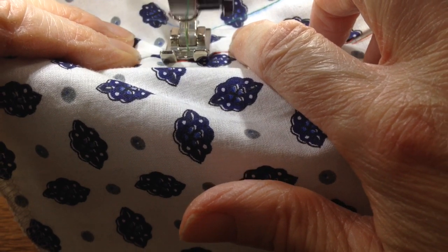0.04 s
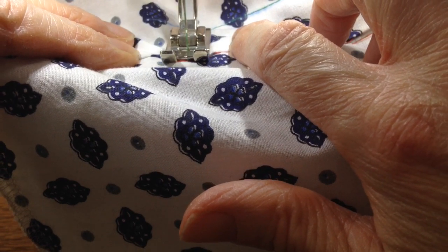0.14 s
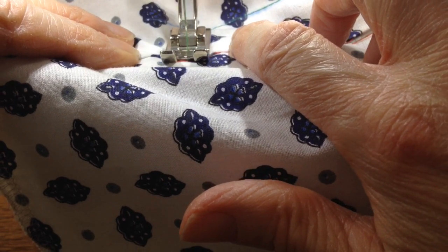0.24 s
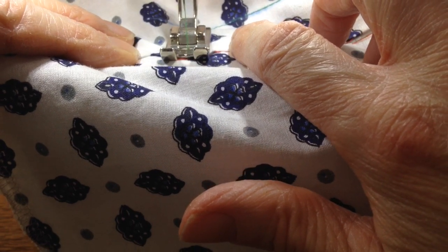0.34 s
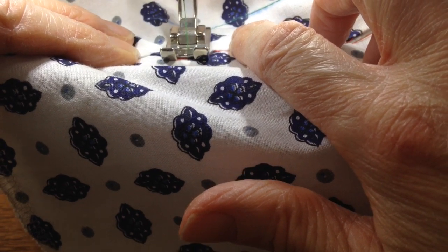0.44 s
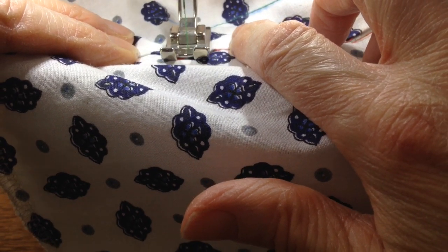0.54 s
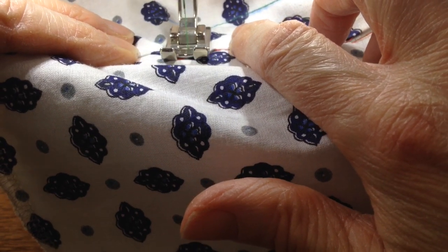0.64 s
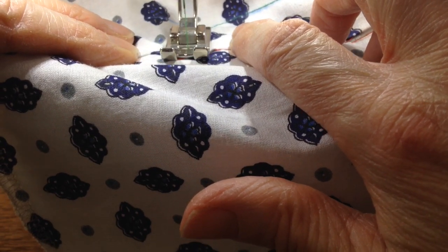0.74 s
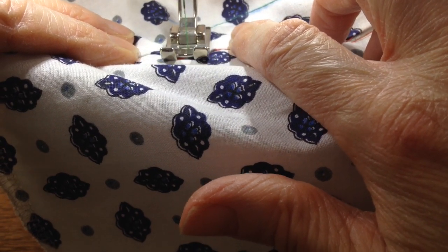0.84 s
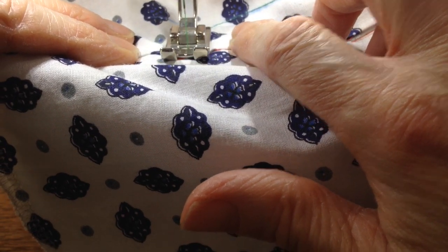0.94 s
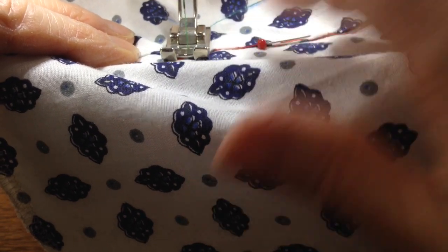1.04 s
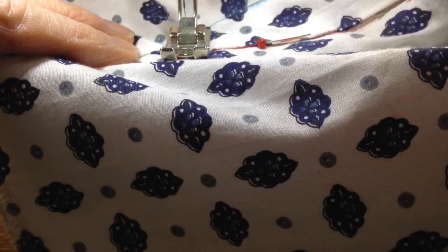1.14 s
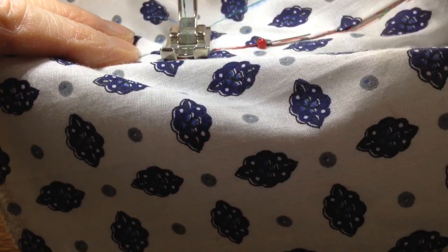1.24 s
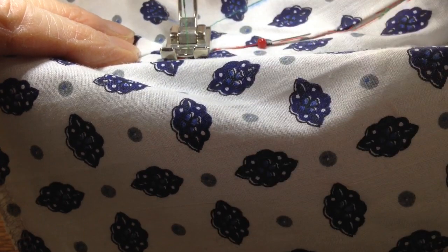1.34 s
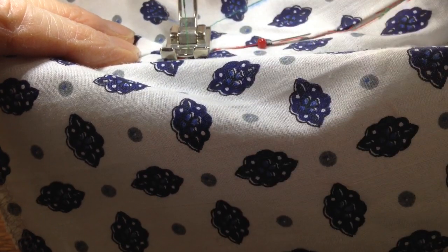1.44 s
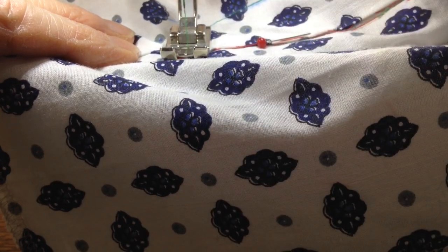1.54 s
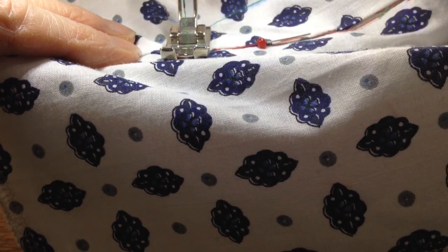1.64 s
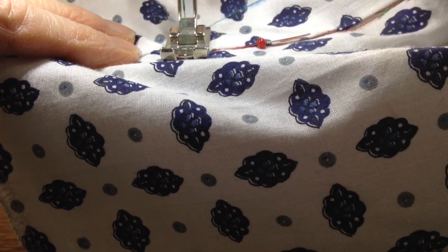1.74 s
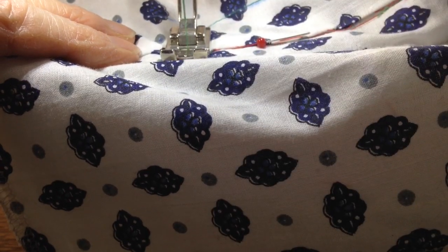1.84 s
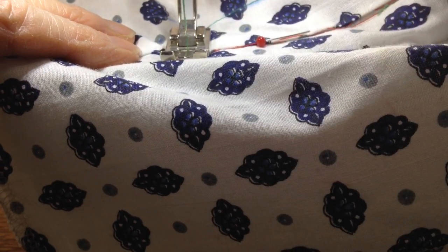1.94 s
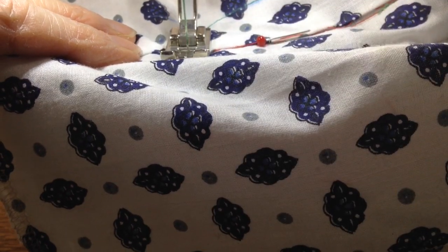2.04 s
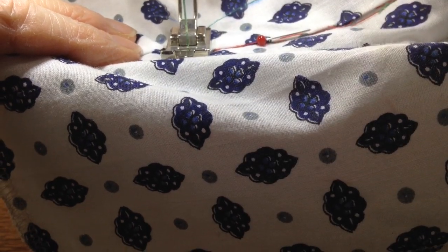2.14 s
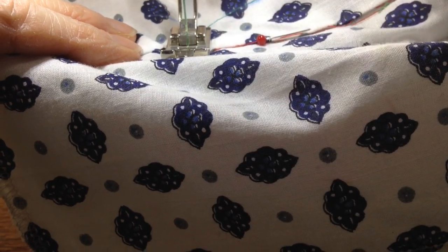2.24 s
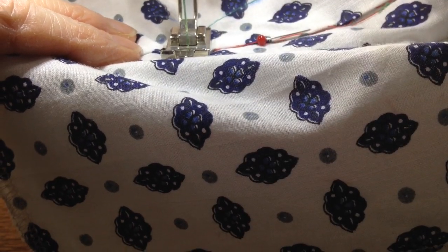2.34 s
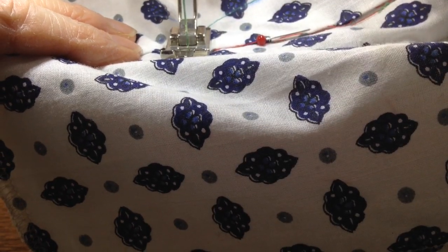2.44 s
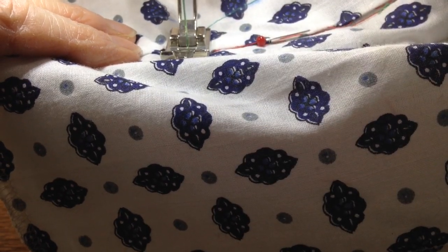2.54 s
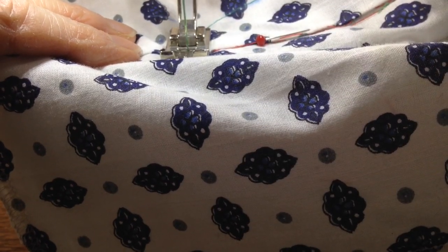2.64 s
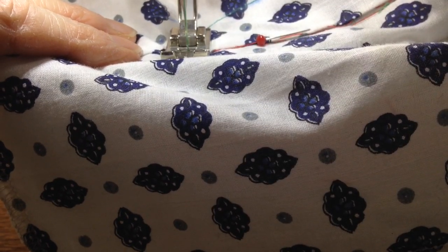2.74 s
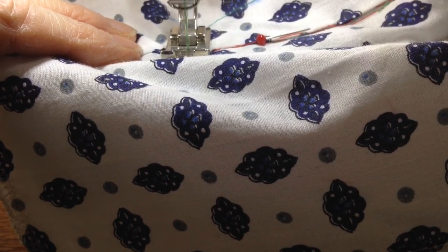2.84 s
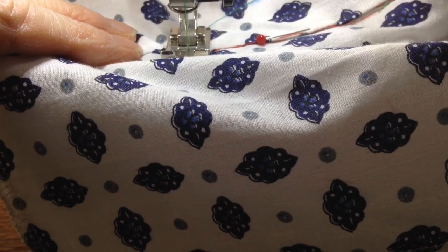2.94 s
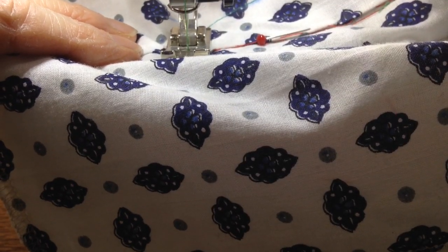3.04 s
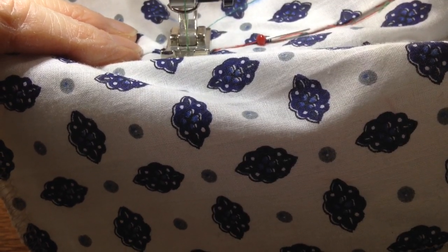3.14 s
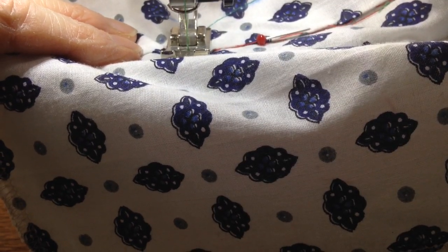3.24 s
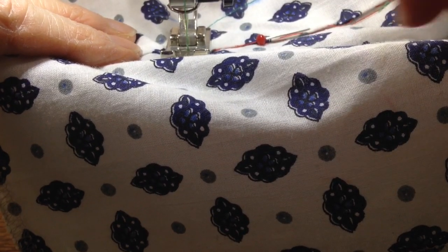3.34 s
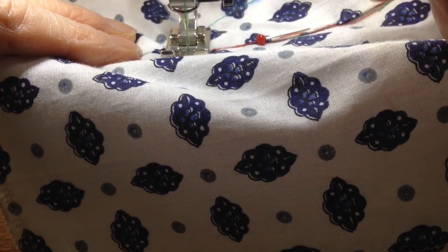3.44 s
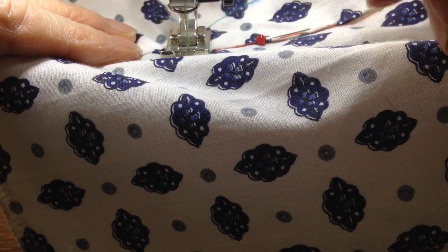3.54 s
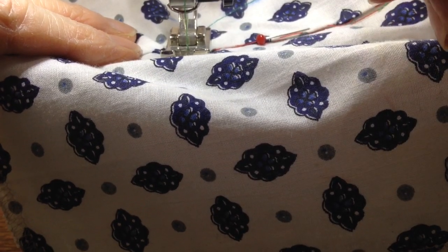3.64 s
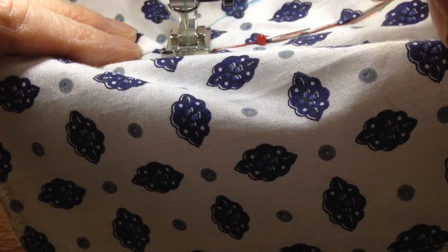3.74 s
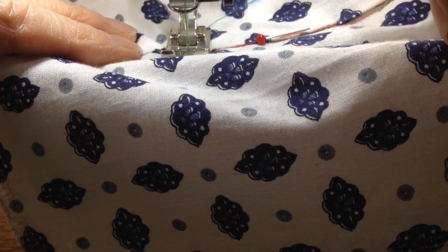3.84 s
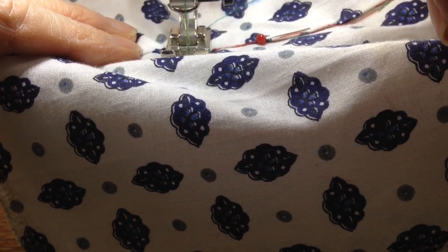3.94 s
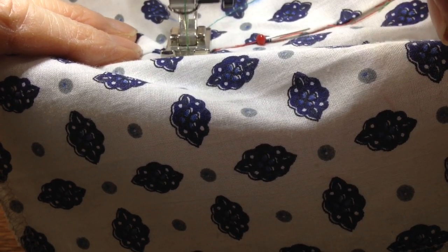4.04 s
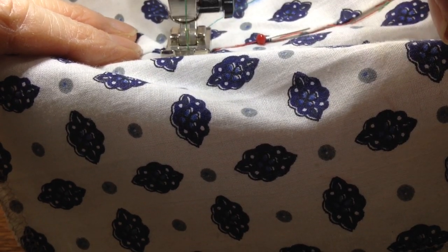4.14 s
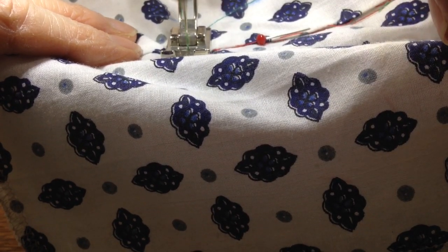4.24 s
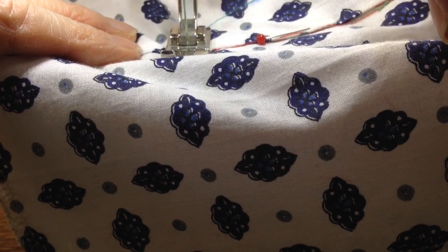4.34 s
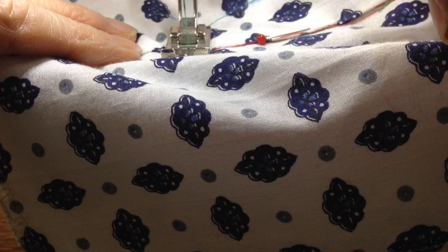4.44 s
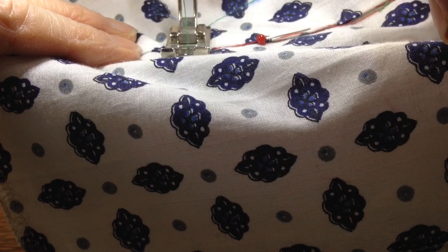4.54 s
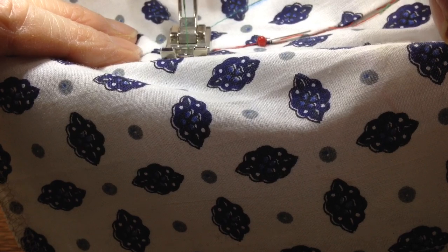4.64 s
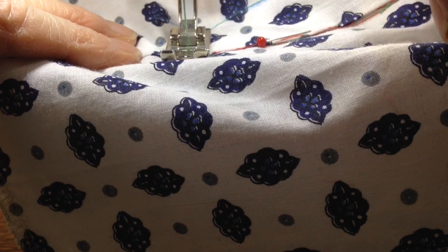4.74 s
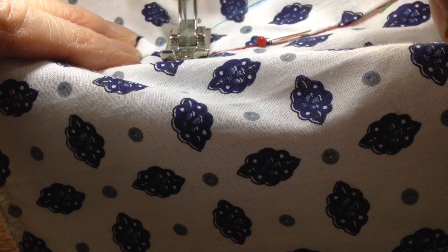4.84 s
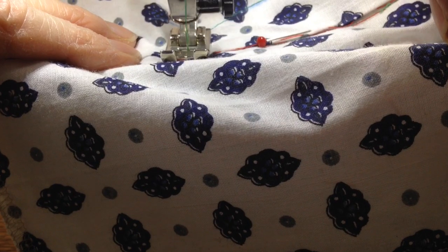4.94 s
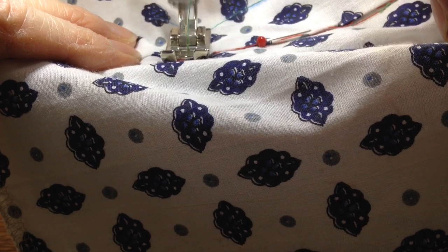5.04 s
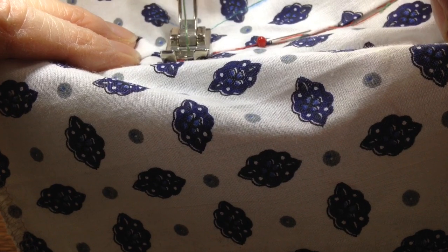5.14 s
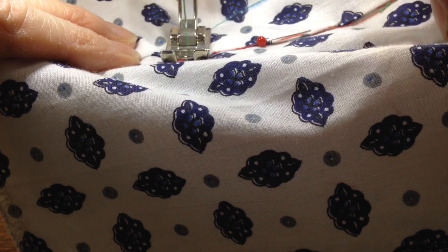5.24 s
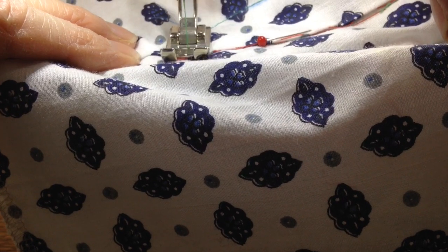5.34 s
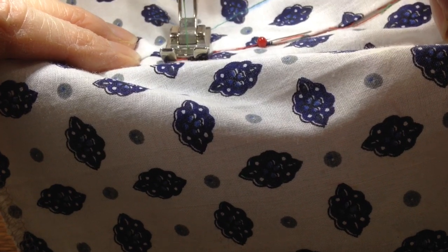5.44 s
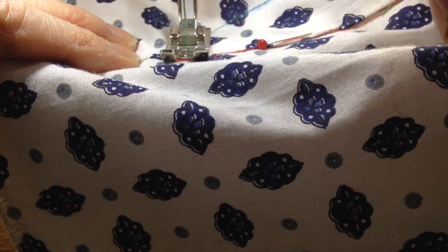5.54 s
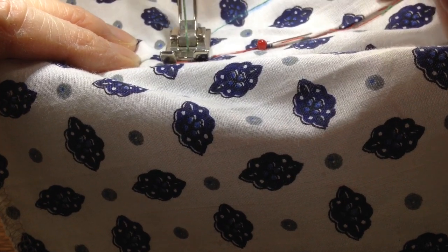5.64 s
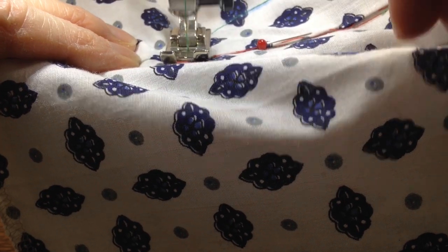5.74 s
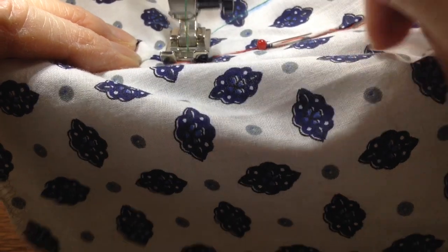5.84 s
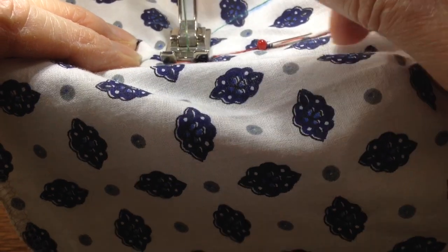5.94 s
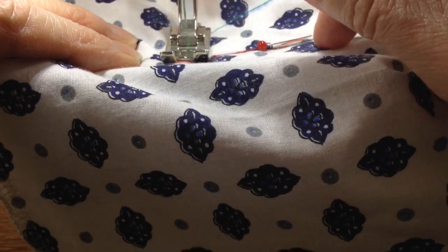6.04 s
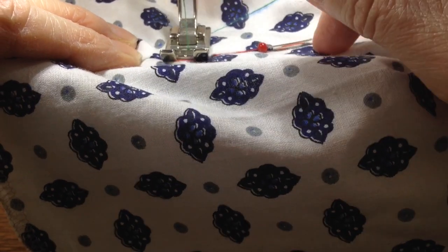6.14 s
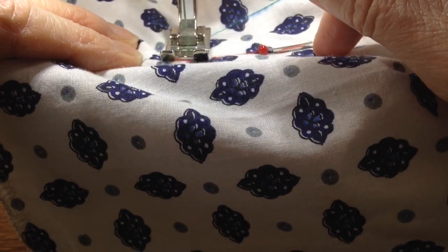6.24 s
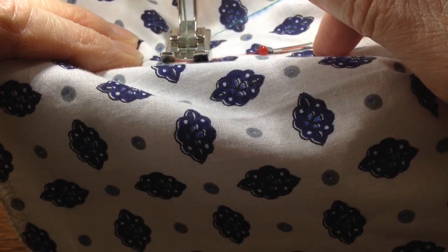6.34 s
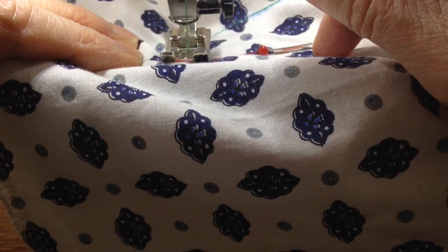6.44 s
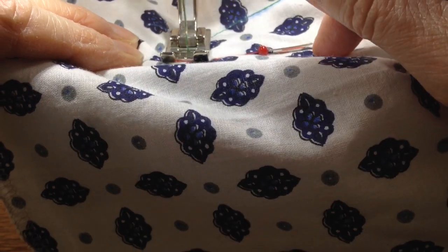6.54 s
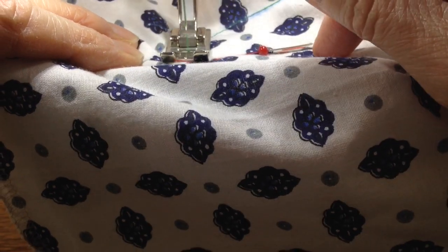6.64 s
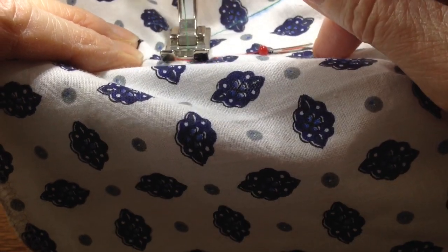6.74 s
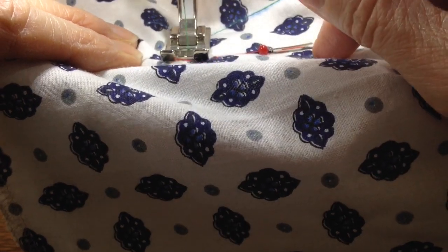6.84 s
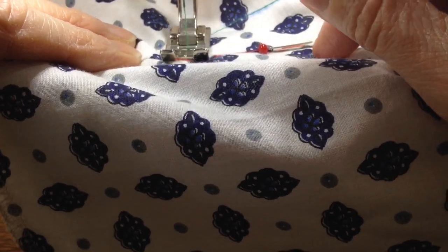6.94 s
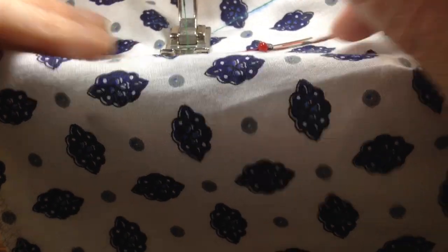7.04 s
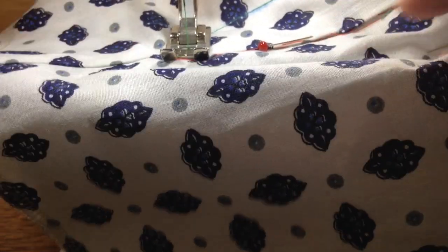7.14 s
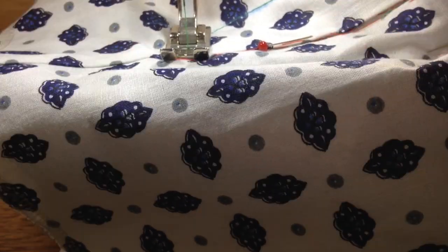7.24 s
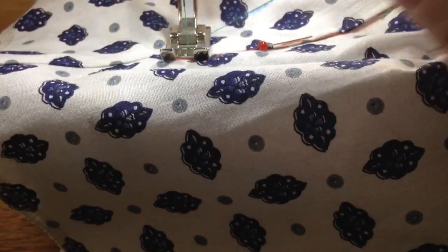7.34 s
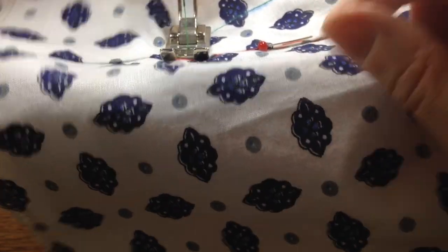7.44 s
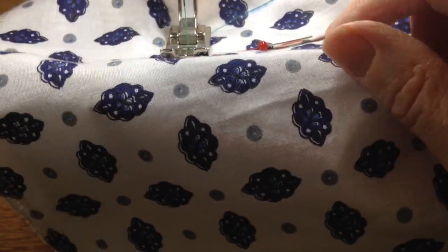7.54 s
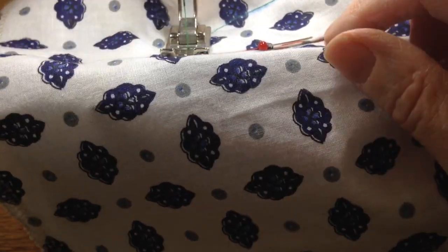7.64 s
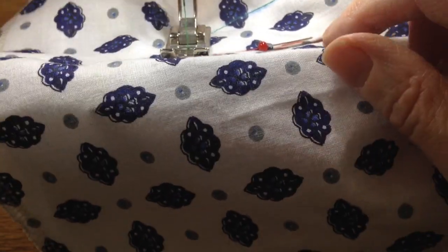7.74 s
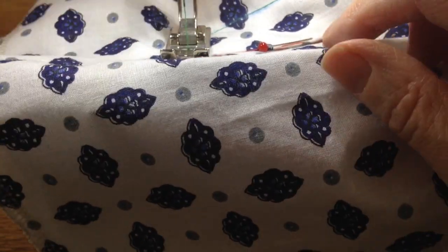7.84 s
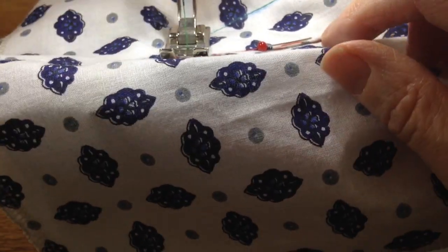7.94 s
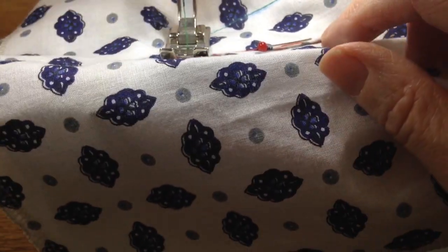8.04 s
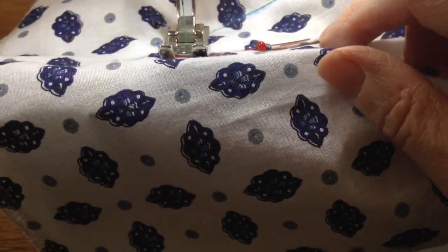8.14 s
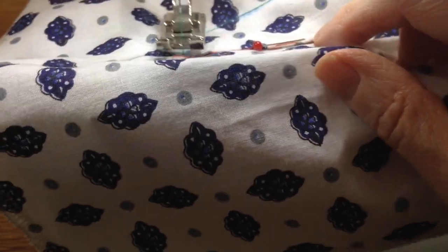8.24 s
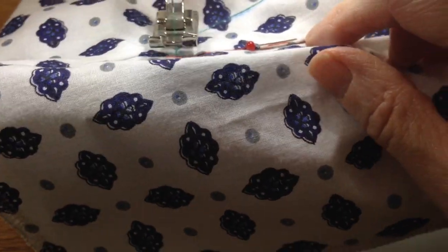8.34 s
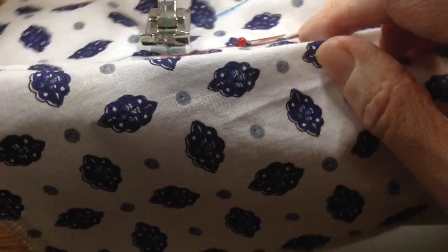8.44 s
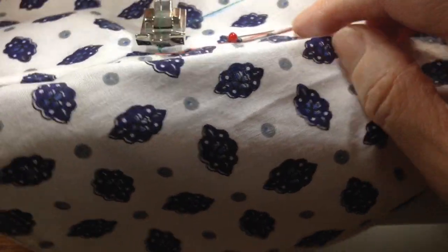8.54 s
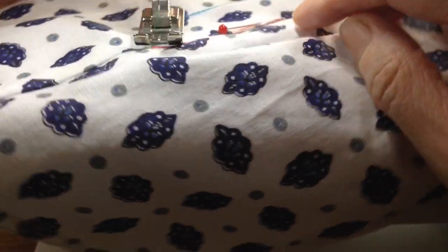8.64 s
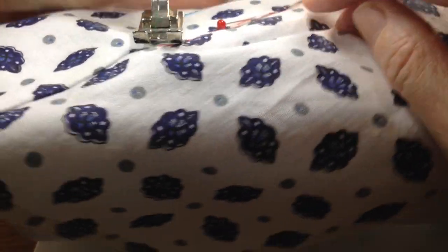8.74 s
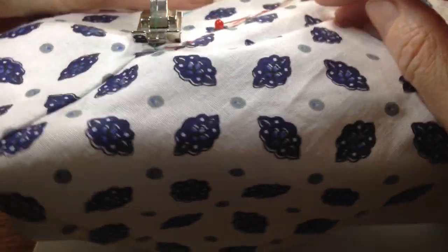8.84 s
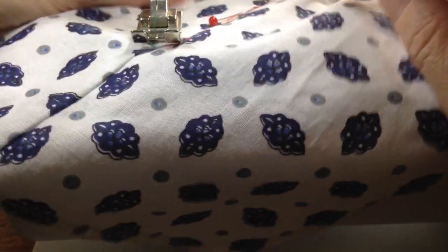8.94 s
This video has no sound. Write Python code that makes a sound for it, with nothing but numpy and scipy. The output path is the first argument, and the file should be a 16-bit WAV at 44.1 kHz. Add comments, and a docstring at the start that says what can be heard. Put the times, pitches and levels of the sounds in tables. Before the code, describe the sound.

Close up in a small room, a sewing machine ticks and whirrs in slow stop-start stitches, with quiet cloth handling and sharp metallic clacks near the end.

```python
"""A household sewing machine stitches cotton slowly, in stop-start runs, close to the microphone in a small room.
Its steel links tick as decaying modes plus bursts of contact noise; the motor hums in unsteady tones and
the drive whirrs as grainy noise through the housing. Thread hisses in shaped noise with a wandering note.
Hands shift the fabric in swells of rumble and rustle, and levers clunk as struck modes of the casing.
A short decaying noise answers for the walls, over a steady faint hiss."""
import sys
import numpy as np
from scipy import signal
from scipy.fft import rfft, irfft, next_fast_len
from scipy.io import wavfile
from scipy.ndimage import map_coordinates

SR = 44100
rng = np.random.default_rng(int(sys.argv[2]) if len(sys.argv) > 2 else 0)


def wav_out(sig):
    """Save sig, one row per channel (or a flat mono array), as 16-bit PCM at SR to the path in sys.argv[1]."""
    wavfile.write(sys.argv[1], SR, np.round(np.clip(np.atleast_2d(sig).T, -1, 1) * 32767).astype(np.int16))


N = 397329


def amp(db):
    """Decibels to gain."""
    return 10 ** (np.asarray(db) / 20)


def unit(x):
    """Scale to rms 1."""
    return x / np.sqrt(np.mean(x ** 2) + 1e-20)


def along(points, hz):
    """Points of (f/Hz, value) read on a log frequency axis."""
    f, v = np.transpose(points)
    return np.interp(np.log(hz + 1), np.log(f + 1), v)


def wobble(rate, size=N):
    """A smooth random curve with rate knots a second."""
    knots = rng.standard_normal(int(size * rate / SR) + 4)
    return map_coordinates(knots, [np.arange(size) * rate / SR])


def filtered(x, response):
    """Filter x by a response given as a function of frequency."""
    m = next_fast_len(len(x) + 8192)
    hz = np.fft.rfftfreq(m, 1 / SR)
    return irfft(rfft(x, m) * response(hz), m)[:len(x)]


def coloured(x, spectrum):
    """Give x the colour of a spectrum, at rms 1."""
    return unit(filtered(x, lambda hz: amp(along(spectrum, hz))))


def grainy(rate, share):
    """White noise with a share of its power in tiny random impacts, rate a second."""
    share = np.clip(share, 0, 1)
    grains = (rng.random(N) < rate / SR) * rng.uniform(-1.1, 1, N)
    return np.sqrt(share) * unit(grains) + np.sqrt(1 - share) * rng.standard_normal(N)


def add(track, s, sound):
    """Mix a sound into a track from s seconds on."""
    start = max(round(s * SR), 0)
    track[start:start + len(sound)] += sound[:max(len(track) - start, 0)]


# steel linkage modes: f/Hz, level/dB, t60/s
STEEL = [(481, 2.5, 0.094), (695.5, -4, 0.0823), (866.5, 1, .08), (1143, -2.5, 0.047), (1328, -2.5, 0.091),
         (1886, -0.5, 0.036), (2076, -2.5, 0.057), (2250, -2.5, 0.083), (2387, -2.5, 0.055),
         (2700, -6, 0.029), (2955.6, -4, 0.044), (3255, -4.5, 0.021), (4100, -7, 0.039), (6200, -12, 0.024),
         (6900, -13, 0.022), (8700, -14.5, 0.016), (13800, -20.5, 0.04)]
# where ticks split into body, ring and treble: f/Hz
TICK_SPLIT_HZ = [1600, 4000]


def linkage():
    """Steel parts slide, take up their play and ring briefly, damped by oil."""
    out = np.zeros(N)
    slide_s, oiled_t60 = 0.012, 0.075
    for s, body_db, ring_db, treble_db, note_hz in contacts():
        hit = strike(STEEL, oiled_t60, crack_db=3.0, crack_t60=0.013, rattle_db=-5.0, rattle_t60=0.1,
                     build_cycles=8.6, bounce_db=-8.5, bounce_gap=0.0031)
        # a hard snap seats at once and stops its own ring
        hardness = np.clip((treble_db + 43) / 8, 0, 1)
        hit = hit * amp(-60 * hardness * np.arange(len(hit)) / SR / 0.0556)
        hit = with_note(hit, note_hz)
        add(out, s, voiced(hit, TICK_SPLIT_HZ, [body_db, ring_db, treble_db], size=441))
        add(out, s - slide_s, scrape(ring_db - 14.5, slide_s))
    return out * amp(-3.0)


# Levels of the contact tables below set the balance ahead of the linkage's common trim.
# marks of each stitch: needle bar turns t/s, needle pierces t/s, hook catches t/s, take-up lever snaps t/s
STITCHES = [(0.110, 0.277, 0.387, 0.581), (4.267, 4.452, 4.5275, 4.7245), (5.079, 5.235, 5.349, 5.533),
            (5.888, 5.963, 6.124, 6.258), (6.533, 6.637, 6.7535, 6.9455)]
# force of each stitch: turn level/dB, pierce level/dB, catch level/dB, snap level/dB,
# looseness before the catch level/dB, thread level/dB
STITCH_FORCE = [(2, -2.5, 2.5, 2.5, -31, 3.5), (-0.5, 7.5, 5, 3.5, -3, -1.5), (-2, 2, -3.5, -4.5, 3.5, 1),
                (0, -4, -1, 2.5, 1, 3.5), (-1.5, 0, 2, 1.5, -3.5, -4)]
# the blow at each mark, before its force: body level/dB, ring level/dB, treble level/dB, note f/Hz
STITCH_BLOWS = [(-77, -45.5, -59, 3033), (-40.5, -45.5, -54.5, 790), (-39, -45.5, -48.5, 880),
                (-52, -34.5, -49.5, 2850)]
# the take-up spring chatters after its snap: gap between rebounds, loss at each, note
REBOUND_S, REBOUND_LOSS_DB, REBOUND_HZ = 0.0055, 5.5, 6450
# its first rebound, before the snap's force: body level/dB, ring level/dB, treble level/dB
REBOUND_DB = [-45.5, -48, -47]
# loose links tick on the needle's way down, before looseness:
# place among the marks 0-3, body level/dB, ring level/dB, treble level/dB, note f/Hz
STITCH_PLAY = [(0.409, -52, -52, -57, 1210), (.5, -47, -51, -56, 770), (1.86, -58.5, -48.5, -61, 3100)]
# the loop slips off the hook, at one level in every stitch:
# place among the marks 0-3, body level/dB, ring level/dB, treble level/dB, note f/Hz
LOOP_SLIPS = [(2.605, -43.5, -43.5, -53, 2205), (2.709, -53.5, -45, -62.5, 2800)]
# the feed dog moves the cloth between stitches: rise t/s, drop t/s
FEEDS = [(4.872, 4.989), (5.6985, 5.807), (6.367, 6.475)]
# force of each feed: rise level/dB, drop level/dB, thread level/dB
FEED_FORCE = [(-1, -5.5, -27), (1, -1, 2.5), (-0.5, 3, -8.5)]
# contacts within any feed, before its force:
# place from rise 0 to drop 1, body level/dB, ring level/dB, treble level/dB, note f/Hz
FEED_CONTACTS = [(0, -44.5, -47.5, -46.5, 2710), (0.123, -44.5, -42, -52, 905),
                 (0.362, -37.5, -43, -45, 1300), (.57, -56.5, -54, -51, 2300), (1, -46.5, -51, -51.5, 800)]
# stray clicks of steel parts touched or snapping: t/s, body level/dB, ring level/dB, note f/Hz
CLICKS = [(0.3731, -43, -48, 840), (0.386, -37.5, -33, 6400), (3.5116, -49.5, -53.5, 1910),
          (3.547, -55, -59.5, 1890), (3.636, -55, -50, 1850), (3.7358, -32.5, -26.5, 2860),
          (3.781, -46.5, -46, 1930), (4.126, -41, -51, 1180), (4.171, -43, -52.5, 1180),
          (4.2894, -51, -49, 2876), (4.511, -58.5, -55, 2700), (4.885, -36.5, -44.5, 1250),
          (5.326, -45, -50.5, 3000), (5.575, -51, -52.5, 2290), (5.613, -59, -53.5, 5300),
          (5.6376, -38, -27.5, 1740), (5.739, -41, -39, 2280), (5.7492, -45, -41, 3200),
          (5.765, -41.5, -39, 1950), (6.116, -52, -45.5, 2900), (7.615, -45.5, -47.5, 1950),
          (7.792, -38.5, -46.5, 1820)]
# fingers tap and nudge the bed, dully: t/s, body level/dB, ring level/dB, note f/Hz
TAPS = [(1.554, -62, -78, 310), (1.881, -59, -57.5, 1510), (1.908, -54, -63, 945),
        (2.021, -60.5, -62, 2530), (2.122, -58, -58, 1500), (2.1516, -53.5, -60, 1870),
        (2.939, -55.5, -60, 1290), (3.037, -60, -72, 1700), (8.2871, -45, -58, 1620)]
CLICK_TREBLE_DB, TAP_TREBLE_DB = -0.5, -17  # relative to the ring


def contacts():
    """Yield every contact that rings the steel: time, body, ring and treble levels, and note."""
    for marks, (*force_db, loose_db, _) in zip(STITCHES, STITCH_FORCE):
        for s, db, (*bands_db, hz) in zip(marks, force_db, STITCH_BLOWS):
            yield s, *(db + np.array(bands_db)), hz
        for k in range(3):
            rebound_db = force_db[-1] - k * REBOUND_LOSS_DB + np.array(REBOUND_DB)
            yield marks[-1] + (k + 1) * REBOUND_S, *rebound_db, REBOUND_HZ
        for place, *bands_db, hz in STITCH_PLAY:
            yield moment(marks, place), *(loose_db + np.array(bands_db)), hz
        for place, *bands_db, hz in LOOP_SLIPS:
            yield moment(marks, place), *bands_db, hz
    for marks, (rise_db, drop_db, _) in zip(FEEDS, FEED_FORCE):
        for place, *bands_db, hz in FEED_CONTACTS:
            force_db = rise_db + place * (drop_db - rise_db)
            yield moment(marks, place), *(force_db + np.array(bands_db)), hz
    for s, body_db, ring_db, hz in CLICKS:
        yield s, body_db, ring_db, ring_db + CLICK_TREBLE_DB, hz
    for s, body_db, ring_db, hz in TAPS:
        yield s, body_db, ring_db, ring_db + TAP_TREBLE_DB, hz
    yield from rattles()


def moment(marks, place):
    """Time of a place in a cycle, moving evenly from mark to mark and on past the last."""
    mark = int(np.clip(place, 0, len(marks) - 2))
    return marks[mark] + (place - mark) * (marks[mark + 1] - marks[mark])


# loose parts rattle when nudged: t/s, length t/s, body level/dB, ring level/dB, treble level/dB
RATTLES = [(1.843, 0.022, -55, -66, -78), (2.719, 0.0322, -53.5, -73.5, -70),
           (2.851, 0.043, -52.5, -63, -62), (3.812, .035, -48.5, -51, -72)]
RATTLE_GAP_S, RATTLE_SCATTER_DB = 0.009, 2.5  # mean time between contacts; spread of their strength
RATTLE_NOTE_HZ, RATTLE_NOTE_OCTAVES = 1312, 0.48  # centre and spread of their notes


def rattles():
    """Loose parts touch in quick uneven contacts, each with its own force and note."""
    for start, length, *bands_db in RATTLES:
        count = max(round(length / RATTLE_GAP_S), 1)
        for k, (late, force, note) in enumerate(rng.standard_normal((count, 3))):
            s = start + (k + 0.5 + late / 4) * length / count
            note_hz = RATTLE_NOTE_HZ * 2 ** (RATTLE_NOTE_OCTAVES * note)
            yield s, *(RATTLE_SCATTER_DB * force + np.array(bands_db)), note_hz


# contact noise: f/Hz, level/dB per Hz
CRACK = [(30, -39.5), (90, -13.5), (250, 1.5), (900, 8), (2400, 3.5), (3500, -1.5), (5500, -6), (9000, -14),
         (15000, -26.5)]
MODE_DRIFT = 0.012  # the modes shift as the parts move: spread as a share of their frequency


def strike(modes, longest_t60, crack_db, crack_t60, rattle_db, rattle_t60, build_cycles, bounce_db, bounce_gap):
    """One blow: modes at new strengths, and a crack that rebounds a few times and ends in a rattle."""
    t = np.arange(SR // 4) / SR
    hz, db, t60 = np.transpose(modes)[:, :, None]
    strength, detune, phase = rng.standard_normal((3, len(modes), 1))
    swing = np.sin(2 * np.pi * (hz * (1 + MODE_DRIFT * detune) * t + phase))
    build = 1 - np.exp(-t * hz / build_cycles)  # low modes take longer to get going
    decay = amp(db + 2 * strength - 60 * t / np.minimum(t60, longest_t60))
    ring = np.sum(decay * build * swing, axis=0)
    crack = amp(crack_db - 60 * t / crack_t60) * (1 - np.exp(-t / 0.00056))
    contact = crack + amp(rattle_db - 60 * t / rattle_t60)
    bounce_times = np.cumsum(bounce_gap * rng.uniform(0.61, 1.6, size=3))
    for bounce, s in enumerate(bounce_times, start=1):
        add(contact, s, amp(bounce * bounce_db) * crack)
    judder = amp(4.5 * wobble(400, size=len(t)))  # the faces touch unevenly
    return ring + contact * judder * coloured(rng.standard_normal(len(t)), CRACK)


def scrape(db, length):
    """A part slides ever harder just before it seats."""
    swell = np.linspace(0, 1, int(length * SR))
    return amp(db) * swell * coloured(rng.standard_normal(len(swell)), CRACK)


NOTE_DB, NOTE_Q = 4, 6.8  # level of the resonance added to the plain hit; its sharpness
NOTE_OCTAVES = 0.04  # spread of the note from blow to blow


def with_note(hit, hz):
    """Add the resonance of the spot that is struck."""
    hz = min(hz * 2 ** (NOTE_OCTAVES * rng.standard_normal()), SR / 4)
    b, a = signal.iirpeak(hz, max(NOTE_Q, 1), fs=SR)
    return hit + amp(NOTE_DB) * signal.lfilter(b, a, hit)


def voiced(hit, splits_hz, levels_db, size):
    """Each point of contact has its own colour: set each band's level over the first size samples."""
    bands = []
    for hz in splits_hz:
        # each filter runs twice for steeper slopes
        low = np.tile(signal.butter(2, hz, "low", fs=SR, output="sos"), (2, 1))
        high = np.tile(signal.butter(2, hz, "high", fs=SR, output="sos"), (2, 1))
        bands.append(signal.sosfilt(low, hit))
        hit = signal.sosfilt(high, hit)
    bands.append(hit)
    return sum(amp(db) * band / np.std(band[:size]) for band, db in zip(bands, levels_db))


# dry steel parts rub and chatter: t/s, length t/s, level/dB
RUBS = [(0.363, 0.029, -45.5), (4.315, 0.037, -49), (5.129, 0.1, -53.5), (5.36, 0.04, -50),
        (5.678, 0.045, -49), (6.646, 0.026, -44.5)]
RUB_RUNNING_DB = -14.5  # faint rubbing whenever the drive turns, relative to its gain
RUB_WIDTH_HZ = 70  # half width of the steel modes while parts press together


def rubbing():
    """Links slide in clumps of tiny slips that set the steel modes chattering."""
    pressure = amp(RUB_RUNNING_DB + 4 * wobble(22)) * running()
    for s, length, db in RUBS:
        add(pressure, s, amp(db) * signal.windows.tukey(int(length * SR), 0.5))
    slips = grainy(rate=420, share=0.7) * pressure

    def steel(f):
        """Broad steel modes in alternating polarity."""
        return sum((-1) ** k * amp(db) / (1 + 1j * (f - hz) / RUB_WIDTH_HZ)
                   for k, (hz, db, _) in enumerate(STEEL))

    return unit(filtered(slips, steel)) * np.std(slips)


# the motor labours, one list for each run: t/s, mains buzz level/dB, drone of the frame level/dB
MOTOR = [
    [(0, -65, -79), (0.21, -65, -72), (0.265, -61, -51), (0.32, -60, -66), (0.385, -49.5, -60),
     (0.46, -71, -69), (0.62, -79.5, -76)],
    [(4.2, -70, -78), (4.31, -59, -64), (4.45, -54.5, -61), (4.56, -65.5, -70), (5.11, -79, -71),
     (5.19, -55, -60), (5.4, -67, -75), (5.86, -70.5, -74), (6.0, -56, -55), (6.09, -63, -59),
     (6.14, -63, -49.5), (6.47, -61, -48), (6.58, -66, -58), (6.66, -65, -50), (6.76, -65, -69.5),
     (6.93, -72, -69)],
]
# colour of belt and gears: f/Hz, level/dB per Hz
WHIRR = [(40, -12.5), (98, 1.5), (200, -4.5), (400, -2), (560, -5.5), (845, -3.5), (1250, -8), (1550, -14),
         (2100, -8), (2800, -17), (4400, -18.5), (7100, -23.5), (15000, -31.5)]
MAINS_HZ, DRONE_HZ = 99.5, 136.7
MAINS_JITTER, DRONE_JITTER = 0.03, 0.012  # pitch wander as a share of the frequency


def drive():
    """The motor buzzes and sets the frame droning; belt and gears chatter in the housing, more as it labours."""
    t = np.arange(N) / SR
    buzz, drone = np.zeros((2, N))
    for run in MOTOR:
        times, buzz_db, drone_db = np.transpose(run)
        inside = (t > times[0]) & (t < times[-1])
        buzz += inside * amp(np.interp(t, times, buzz_db))
        drone += inside * amp(np.interp(t, times, drone_db))
    hum = buzz * motor_tone(MAINS_HZ, MAINS_JITTER, overtones_db=-4.5)
    hum = hum + drone * motor_tone(DRONE_HZ, DRONE_JITTER, overtones_db=-8.5)
    pulse_db = 2.2 * np.sin(2 * np.pi * MAINS_HZ * t) + 2.9 * wobble(40)
    chatter = grainy(rate=300, share=0.22) * amp(pulse_db)
    whirr = coloured(filtered(chatter, lambda f: amp(housing_db(f))), WHIRR)
    return hum + np.hypot(running(), amp(-1.0) * drone) * whirr


# the drive holds full level, swelling up before and fading after: from t/s, to t/s, level/dB
RUNS = [(0, 0.59, -53.5), (4.264, 6.93, -53)]
SPIN_UP_S, COAST_S = 0.273, 0.062  # time to gain or lose 20 dB


def running():
    """Gain of the drive: it swells up ahead of each run, holds full level through it and fades after."""
    t = np.arange(N) / SR
    gain = np.zeros(N)
    for start, stop, db in RUNS:
        spin_up_db = 20 * np.maximum(start - t, 0) / SPIN_UP_S
        coast_db = 20 * np.maximum(t - stop, 0) / COAST_S
        gain += amp(db - spin_up_db - coast_db)
    return gain


def motor_tone(hz, jitter, overtones_db):
    """An unsteady tone whose overtones swell in the housing's resonances."""
    unsteady_hz = hz * (1 + jitter * (wobble(70) + wobble(7)))
    turn = 2 * np.pi * np.cumsum(unsteady_hz) / SR
    overtones = sum(amp(housing_db(k * hz) + 3 * wobble(14)) * np.sin(k * turn) / k for k in np.arange(2, 8))
    return amp(3.7 * wobble(25)) * unit(np.sin(turn) + amp(overtones_db) * overtones)


# resonances of the housing: f/Hz, width f/Hz, lift level/dB
HOUSING = [(275, 35, 3.5), (338.5, 30, 10), (380.6, 54, 5), (480, 6.6, 13), (803, 30, 8), (1230, 34, 11),
           (2024, 140, 1), (3000, 74, 1)]


def housing_db(hz):
    """How much the housing lifts each frequency."""
    return sum(db / (1 + (2 * (hz - centre) / width) ** 2) for centre, width, db in HOUSING)


# heavy blows on the casing: t/s, level/dB, brightness level/dB per band, table thump level/dB,
# note of the struck spot f/Hz
KNOCKS = [(2.325, -63.5, -8, -72, 490), (2.749, -38.5, -2.5, -55, 264), (3.837, -46.5, -4.5, -60.5, 1410),
          (3.849, -57, -10, -48, 327), (6.384, -25, 3, -38, 1272), (6.402, -39.5, 1, -48.5, 325),
          (6.426, -41.5, 1.5, -43.5, 290), (7.538, -75, 5, -59, 306.4), (7.767, -45.5, -4, -43, 337.6),
          (7.8138, -29.5, -1, -47, 410.3), (7.841, -46.5, -7, -55.5, 706), (7.895, -52, -6, -67, 393),
          (8.3435, -26, -5.5, -39.5, 348), (8.357, -35.5, -1, -55, 1600), (8.402, -56, -11, -55, 380)]
# casing modes: f/Hz, level/dB, t60/s
CASING = [(89, -17, 0.12), (293.4, -6.5, 0.15), (355, -2, 0.11), (392.7, -6.5, 0.1), (512, -3, 0.097),
          (681, 1.5, 0.054), (833, -1, 0.074), (929, 4, 0.03), (1121, -0.5, 0.045), (1346, 1, 0.054),
          (1590, 4, 0.029), (1933, -0.5, 0.02), (2070, -0.5, 0.027), (2280, 0.5, 0.053), (4320, -4, 0.028),
          (5140, 0, 0.033)]
# where knocks split into thump, thud, body, ring and treble: f/Hz
KNOCK_SPLIT_HZ = [200, 600, 1400, 2800]
# offsets of thud, body, ring and treble from each knock: level/dB
KNOCK_BANDS_DB = [-4.5, -3.5, -4, -12]


def clunks():
    """Levers snap over and shake the whole casing, which the table damps."""
    out = np.zeros(N)
    slide_s, table_t60 = 0.01, 0.14
    for s, db, bright_db, thump_db, note_hz in KNOCKS:
        levels_db = [thump_db]
        for step, band_db in enumerate(KNOCK_BANDS_DB, start=-1):  # brightness tilts about the body
            levels_db.append(db + band_db + bright_db * step)
        hit = strike(CASING, table_t60, crack_db=9.0, crack_t60=0.019, rattle_db=-7.0, rattle_t60=0.21,
                     build_cycles=0.62, bounce_db=-5.5, bounce_gap=0.0033)
        add(out, s, voiced(with_note(hit, note_hz), KNOCK_SPLIT_HZ, levels_db, size=1100))
        add(out, s - slide_s, scrape(levels_db[-1] - 11.5, slide_s))
    return out


# the presser-foot lever snaps against its stop: t/s, body level/dB, ring level/dB, treble level/dB
LEVER_SNAPS = [(7.808, -25, -26.5, -37), (8.338, -22.5, -34, -39.5)]
# lever modes: f/Hz, level/dB, t60/s
LEVER = [(530, -10.5, 0.053), (845, -3, 0.032), (940, -4, 0.034), (1690, -11, .02), (1943, 11.5, 0.013),
         (2270, -12, .03), (5040, -21, 0.045)]


def lever():
    """The presser-foot lever hits its stop with a hard clack of short modes."""
    out = np.zeros(N)
    for s, *levels_db in LEVER_SNAPS:
        hit = strike(LEVER, np.inf, crack_db=-12.0, crack_t60=0.033, rattle_db=-26, rattle_t60=0.057,
                     build_cycles=0.79, bounce_db=-9.5, bounce_gap=0.0045)
        add(out, s, voiced(hit, TICK_SPLIT_HZ, levels_db, size=1100))
    return out


# thread runs as the needle goes down and as the hook draws the loop, before each stitch's force:
# from place among the marks, to place, level/dB
STITCH_PULLS = [(0.353, 1.306, -66), (1.96, 2.92, -58.5)]
# thread hiss: f/Hz, level/dB per Hz
THREAD = [(1500, -27), (3500, -5), (4900, 3.5), (5600, 1.5), (6500, -7.5), (8000, -6.5), (11000, -13),
          (15000, -16)]
FEED_PULL_DB = -58.5  # before each feed's force
# the taut thread sings, its note wandering with the tension; level relative to the hiss
THREAD_NOTE_HZ, THREAD_NOTE_SWING_HZ, THREAD_NOTE_DB = 4950, 200, -8.5


def thread():
    """Each stitch and feed drags thread through the weave: a grainy, singing hiss that swells and fades."""
    pulls = []
    for marks, (*_, thread_db) in zip(STITCHES, STITCH_FORCE):
        for first, last, db in STITCH_PULLS:
            pulls.append((moment(marks, first), moment(marks, last), db + thread_db))
    for (rise, drop), (*_, thread_db) in zip(FEEDS, FEED_FORCE):
        pulls.append((rise, drop, FEED_PULL_DB + thread_db))
    pull = np.zeros(N)
    for start, end, db in pulls:
        add(pull, start, amp(db) * signal.windows.tukey(max(int((end - start) * SR), 1), 0.5))
    turn = 2 * np.pi * np.cumsum(THREAD_NOTE_HZ + THREAD_NOTE_SWING_HZ * wobble(20)) / SR
    note = unit(wobble(400) * np.sin(turn))
    hiss = coloured(grainy(rate=3600, share=0.18), THREAD)
    return pull * unit(hiss + amp(THREAD_NOTE_DB) * note)


# hands push the cloth, before the drag's swing and trim: t/s, length t/s, rumble level/dB, rustle level/dB
HANDS = [(1.033, 0.33, -80, -66), (1.749, 0.37, -59.5, -62.5), (2.053, 0.2, -58.5, -71),
         (2.6, 0.4, -59, -64.5), (2.932, 0.2, -62, -82), (3.78, 0.21, -55, -67), (6.97, 0.23, -64.5, -59.5),
         (7.731, 0.21, -54, -58.5), (8.155, 0.47, -57.5, -56.5), (8.604, 0.068, -81, -56),
         (8.56, 0.26, -67, -54.5), (8.717, 0.615, -65, -58.5)]
# colour of the bed under the hands: f/Hz, level/dB per Hz
RUMBLE = [(25, -10), (80, -6.5), (135, 5.5), (200, -12), (320, 1.5), (480, -5), (900, -14), (2000, -54.5)]
# colour of the sliding cotton: f/Hz, level/dB per Hz
RUSTLE = [(300, -4), (800, -7), (1500, -4.5), (2500, -7.5), (5000, -14.5), (9000, -21), (15000, -28.5)]
HAND_RISE, HAND_CURVE = 0.34, 0.79  # share of a push spent speeding up; how peaked it is


def fabric():
    """Hands drag the cotton over the bed in uneven little slips, and the bed rumbles under them."""
    weight, sweep = np.zeros(N), np.zeros(N)
    for s, length, rumble_db, rustle_db in HANDS:
        progress = np.linspace(0, 1, int(length * SR))
        speed = np.interp(progress, [0, HAND_RISE, 1], [0, 1, 0])
        push = np.sin(np.pi / 2 * speed) ** HAND_CURVE
        add(weight, s, amp(rumble_db) * push)
        add(sweep, s, amp(rustle_db) * push)
    drag_db = 1.8 * wobble(60)
    rumble = weight * amp(0.5 * drag_db - 0.5) * coloured(rng.standard_normal(N), RUMBLE)
    rustle = sweep * amp(drag_db - 2.0) * coloured(grainy(rate=520, share=0.3), RUSTLE)
    return rumble + rustle


# cloth sliding on the bed sings faintly: t/s, length t/s, level/dB
SQUEAKS = [(1.12, 0.16, -71.5), (7.003, 0.16, -73)]
SQUEAK_HZ, SQUEAK_WIDTH_HZ = 1596, 37


def squeak():
    """Taut cloth slides over the bed with a thin, rough note of narrow noise."""
    slide = np.zeros(N)
    for s, length, db in SQUEAKS:
        add(slide, s, amp(db) * signal.windows.tukey(int(length * SR), 0.5))
    note = filtered(rng.standard_normal(N), lambda hz: 1 / (1 + ((hz - SQUEAK_HZ) / SQUEAK_WIDTH_HZ) ** 2))
    return slide * unit(note)


# decay of the room: f/Hz, t60/s
ROOM = [(150, 0.5), (500, 0.36), (2000, 0.18), (5000, 0.097), (12000, 0.082)]


def room(x):
    """The walls answer after a few milliseconds; treble dies first."""
    hz, t, z = signal.stft(rng.standard_normal(SR // 2), SR, nperseg=256)
    decay = amp(-60 * t / along(ROOM, hz)[:, None])
    tail = signal.istft(z * decay, SR, nperseg=256)[1]
    tail = np.concatenate([np.zeros(int(0.007 * SR)), tail / np.linalg.norm(tail)])
    return signal.fftconvolve(x, tail)[:N]


# colour of the background hiss: f/Hz, level/dB per Hz
QUIET = [(15, -50.5), (25, -4.5), (104, 0.5), (270, -3), (598, -8.5), (1140, -15.5), (4260, -12),
         (15500, -16)]
QUIET_DB = -63.5


def background():
    """A steady faint hiss of shaped noise."""
    return amp(QUIET_DB) * coloured(rng.standard_normal(N), QUIET)


def scene():
    """Machine and cloth in the room, over a steady faint hiss."""
    ticks = linkage() + rubbing()
    knocks = clunks() + lever()
    walls = room(amp(-15.0) * ticks + amp(-20.0) * knocks)
    machine = ticks + knocks + walls + drive()
    cloth = thread() + fabric() + squeak()
    return (machine + cloth + background())[None]


TOP_HZ = 15600  # band limit


def record(dry):
    """The small microphone loses the deep bass and keeps nothing above its band limit."""
    bass_cut = signal.butter(2, 40, "high", fs=SR, output="sos")
    lean = signal.sosfilt(bass_cut, dry[0])
    return filtered(lean, lambda hz: hz < TOP_HZ)[None]


dry = scene()
out = record(dry)
wav_out(out)
```